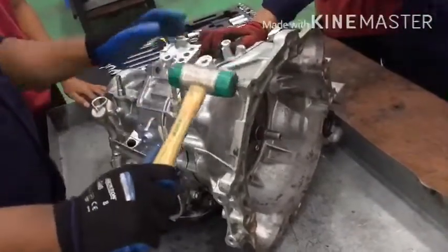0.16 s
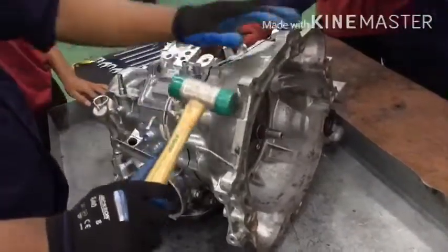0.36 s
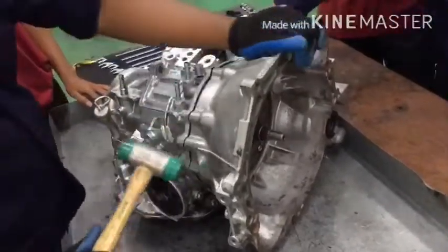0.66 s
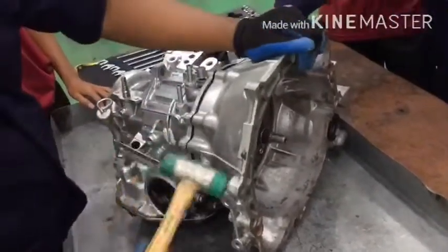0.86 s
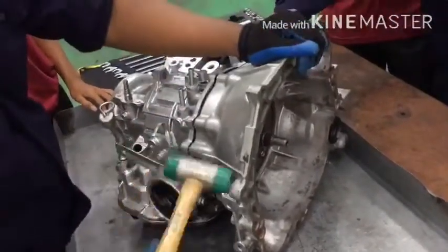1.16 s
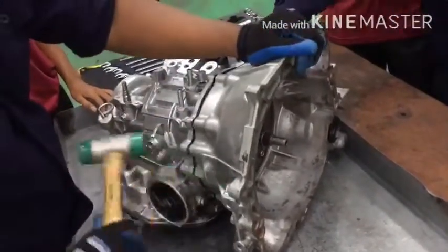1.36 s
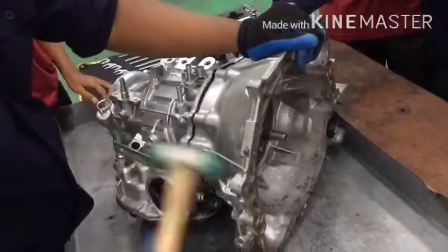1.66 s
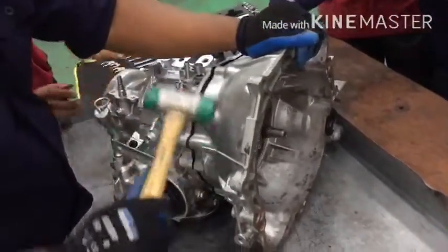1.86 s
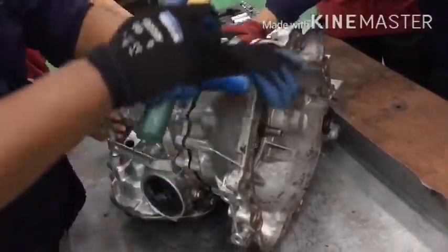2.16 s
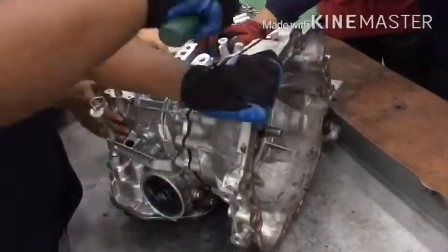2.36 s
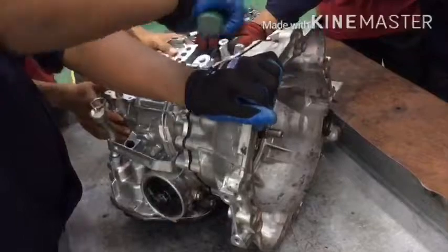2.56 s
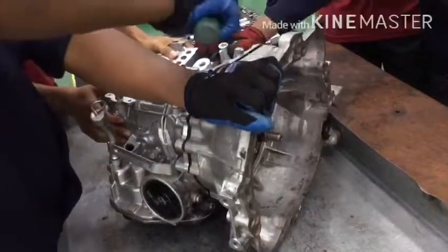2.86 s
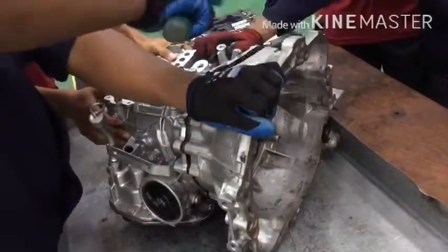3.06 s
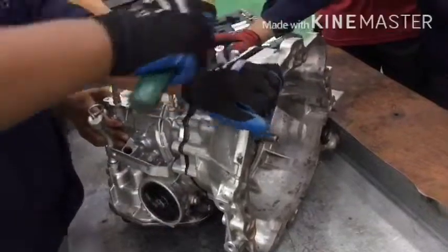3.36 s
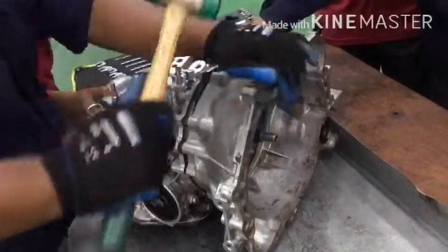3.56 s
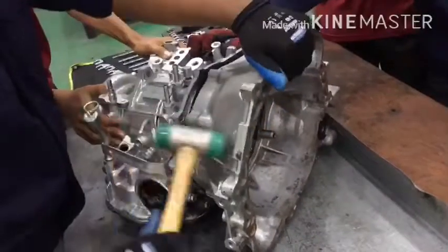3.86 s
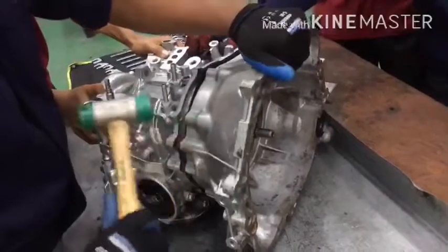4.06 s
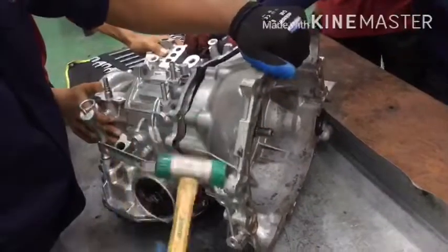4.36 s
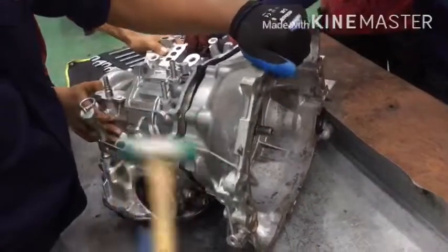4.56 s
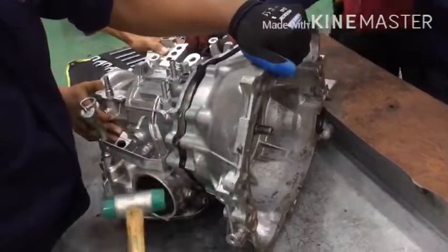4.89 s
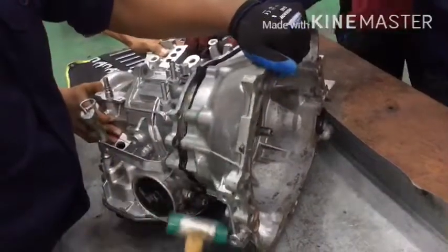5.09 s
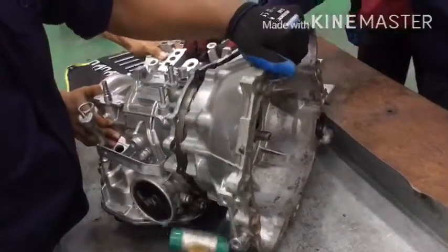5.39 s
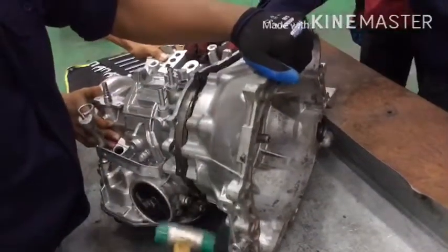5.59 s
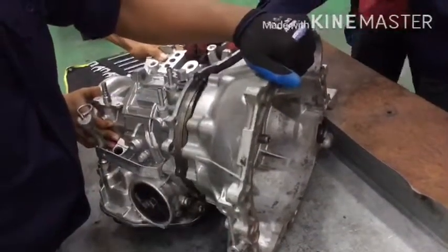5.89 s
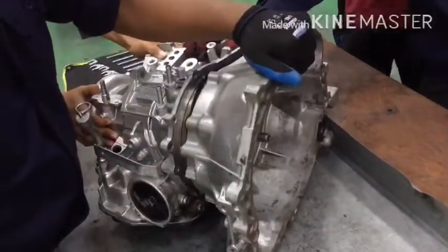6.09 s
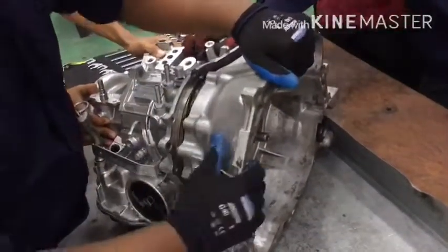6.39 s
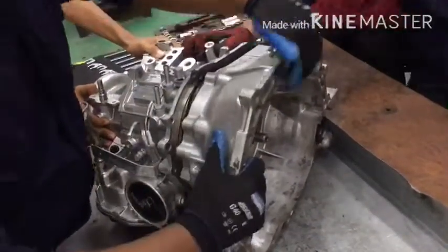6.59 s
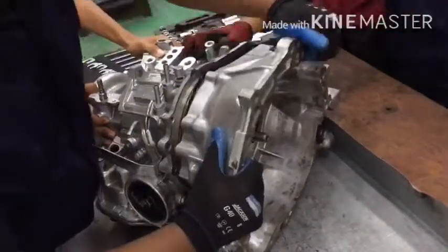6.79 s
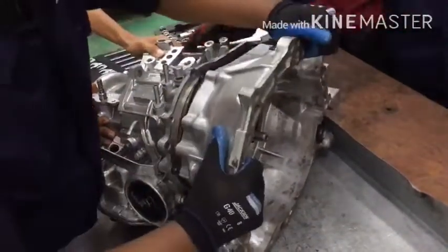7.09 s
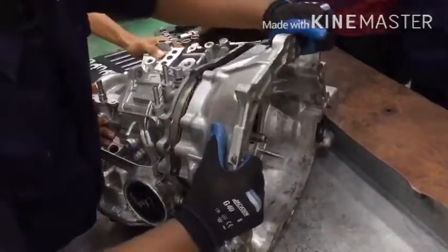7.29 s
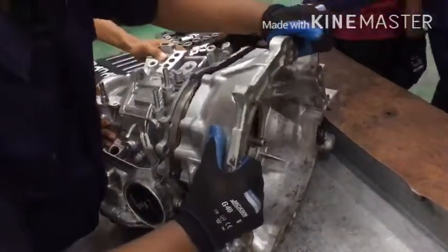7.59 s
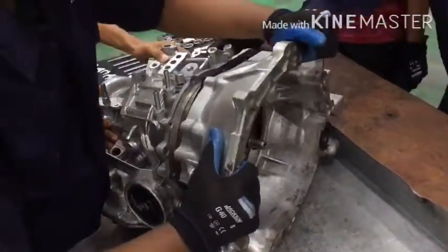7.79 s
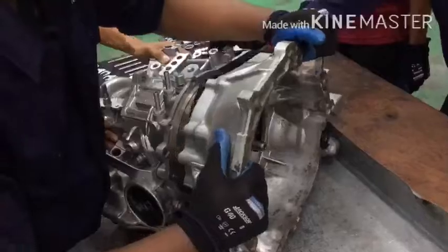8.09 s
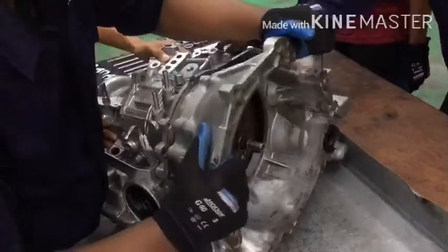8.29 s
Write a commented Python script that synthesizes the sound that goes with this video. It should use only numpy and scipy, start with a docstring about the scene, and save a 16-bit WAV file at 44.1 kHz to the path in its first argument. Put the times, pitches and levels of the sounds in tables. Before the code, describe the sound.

A close microphone in a reverberant workshop picks up irregular low air buffeting, with abrupt puffs, over a soft steady rush. A barely audible tick comes at 0.5 s. Mallet knocks on a cast aluminium housing follow at about 1.0, 1.3, 1.55 and 1.8 s, hollow and clanking with a bench thump, the last heaviest and distorted. A lighter double contact at 2.7 s leads to hard, short blows at 3.0 and 3.3 s. From 4.0 to 4.8 s come duller, lower knocks, some doubled. A strong, brighter ringing blow hits at 5.2 s, another double at 5.5 s. At 6.0 to 6.3 s the loosened half clatters, thinner and brighter. Light scrapes and clinks follow at 6.4, 6.8 and 6.9 s, then thicken from 7.3 s into gritty small rattles, brightest and loudest near 8.35 s, continuing to the end at about 8.4 s.

```python
"""In a workshop, a plastic-faced mallet knocks a cast aluminium gearbox housing on a steel bench until it opens.
Knocks are impact-excited damped modes with noise for dense modes, clashing metal and the bench's thump.
The loosened half clatters, then clinks as it is worked free by hand: grainy scrapes with rim modes.
Moving air, probably from a fan, buffets the close microphone as turbulent noise over a steady rush.
Filtered noise gives the room's reflections; the hardest blows overload the microphone."""
import sys
import numpy as np
from scipy import signal
from scipy.fft import rfft, irfft
from scipy.io import wavfile
from scipy.ndimage import uniform_filter1d

SR = 44100
rng = np.random.default_rng(int(sys.argv[2]) if len(sys.argv) > 2 else 0)


def dump(signal):
    """Clip the signal to [-1, 1] and save it as 16-bit WAV at the path in sys.argv[1]."""
    limited = np.clip(np.atleast_2d(signal).T, -1, 1)
    pcm = np.round(limited * 32767).astype(np.int16)
    wavfile.write(sys.argv[1], SR, pcm)


N = 372644
TIME = np.arange(N) / SR
RING = np.arange(SR // 2) / SR  # time axis of one contact [s]


def undb(db):
    """Level law: converts decibels to an amplitude gain."""
    return 10 ** (np.asarray(db) / 20)


def unit(x):
    """Normalisation: scales a signal to rms 1."""
    return x / np.sqrt(np.mean(x ** 2))


def fade(t60):
    """Exponential damping: falls 60 dB in t60 seconds, over the time axis of one contact."""
    return np.exp(-np.log(1000) * RING / t60)


def noise(gain, size):
    """Spectral shaping: white noise filtered by gain(Hz) and scaled to rms 1."""
    f = np.maximum(np.fft.rfftfreq(size, 1 / SR), 1)
    spectrum = rfft(rng.standard_normal(size)) * gain(f)
    return unit(irfft(spectrum, size))


def colour(points):
    """Spectral envelope: a gain function through (frequency [Hz], level [dB]) points on a log axis."""
    hz, db = np.transpose(points)
    return lambda f: undb(np.interp(np.log(f), np.log(hz), db))


def ripple(gain, depth_db, spacing_hz):
    """Modal clustering: each contact drives its own clusters, as random peaks and dips in a spectrum."""
    db = depth_db * rng.standard_normal(400)
    return lambda f: gain(f) * undb(np.interp(f / spacing_hz, np.arange(len(db)), db))


def even(x, seconds):
    """Envelope levelling: divides a signal by its moving rms to even out slow swells."""
    return x / np.sqrt(uniform_filter1d(x ** 2, int(seconds * SR)) + 1e-9)


def walk(rate):
    """Random modulation: wanders between random values drawn at a rate in Hz, with spread near 1."""
    k = int(SR / rate)
    steps = np.repeat(rng.standard_normal(N // k + 1), k)
    return unit(uniform_filter1d(steps, k)[:N])


def add(out, s, sound):
    """Superposition: mixes a sound in at time s."""
    i = max(int(s * SR), 0)
    out[i:i + len(sound)] += sound[:N - i]


def damped_modes(hz, t60, detune):
    """Modal vibration: one decaying sine per mode, with random phase and a relative random detuning."""
    tuned = hz * (1 + detune * rng.standard_normal(len(hz)))
    cycles = tuned[:, None] * RING + rng.random((len(hz), 1))
    return np.sin(2 * np.pi * cycles) * fade(t60[:, None])


def air_flow():
    """Turbulent flow: the draught flutters; gusts, and one low shake, add swells and abrupt bursts."""
    # mean air flow over the microphone, before trim: (time [s], rumble level [dB])
    draught = [(0.0, -13), (0.42, -21.5), (0.86, -18.5), (1.52, -24), (1.73, -15), (2.08, -17.5),
               (2.74, -23), (3.34, -17.5), (3.93, -29.5), (4.19, -20.5), (4.37, -28), (4.75, -16.5),
               (5.05, -30), (5.45, -24.5), (5.87, -32), (6.55, -18.5), (6.92, -22.5), (7.09, -16),
               (7.44, -19), (7.65, -34.5), (8.26, -22.5), (8.4, -14)]
    # strongest gusts, and one low shake (at 5.226 s) after the hard blow at 5.18 s; rumble before trim:
    # (start [s], rumble level [dB], length [s], eddy level [dB])
    gusts_and_shake = [(0.057, -10, 0.033, -18.5), (0.171, -15.5, .02, -22.5), (0.634, -12, 0.041, -15),
                       (.763, -19, 0.0074, -15.5), (.885, -14.5, 0.011, -14.5), (1.588, -9, 0.024, -19.5),
                       (1.647, -20, 0.023, -15), (1.682, -23, 0.018, -12.5), (1.76, -15, 0.088, -18.5),
                       (1.956, -14, 0.037, -20), (2.013, -15, 0.029, -11.5), (2.133, -9.5, .022, -14),
                       (2.255, -30, 0.0092, -12.5), (2.282, -13.5, 0.018, -14.5), (2.383, -17, 0.014, -30),
                       (2.629, -17, 0.023, -16), (2.682, -16, 0.075, -20), (3.259, -19.5, 0.01, -22.5),
                       (3.358, -16, 0.011, -14), (3.401, -15, 0.04, -19), (4.205, -16, 0.027, -24),
                       (4.347, -17, .02, -27), (4.574, -15, 0.013, -17.5), (4.61, -29, 0.0062, -12.5),
                       (4.798, -15.5, 0.05, -23), (4.917, -9, 0.024, -13.5), (5.071, -18.5, 0.025, -22),
                       (5.226, -17, 0.032, -21.5), (5.28, -13, .048, -14), (5.598, -14, 0.023, -27),
                       (5.694, -18.5, 0.027, -27.5), (6.151, -8, 0.025, -13.5), (6.438, -15, 0.073, -20.5),
                       (6.515, -11, 0.044, -10.5), (6.58, -25, 0.014, -16.5), (6.721, -12, 0.037, -19),
                       (6.932, -15, 0.023, -19), (6.992, -15.5, .03, -24.5), (7.048, -16, 0.063, -20),
                       (7.182, -10.5, 0.016, -33), (7.488, -12.5, 0.057, -18), (7.84, -13.5, 0.043, -30),
                       (8.336, -17, 0.11, -25)]
    draught_trim_db, swell_trim_db = -1, 1
    flutter_hz, flutter_db = 14, 2  # random puffs: rate and spread
    draught_eddy_db = -18  # eddies of the mean flow, relative to its rumble
    attack_s, release_s = 0.003, 0.0092  # time constants of the bursts
    swell_s, swell_share = 0.011, 0.44  # Gaussian half width: a minimum plus a share of the length

    mean_db = np.interp(TIME, *np.transpose(draught)) + draught_trim_db
    flow = undb(mean_db + flutter_db * walk(flutter_hz))
    force = flow * undb(draught_eddy_db)
    for s, db, length, eddy_db in gusts_and_shake:
        near = abs(TIME - s) < 0.25
        since = TIME[near] - s
        swell = np.exp(-0.5 * ((since - length / 2) / (swell_s + swell_share * length)) ** 2)
        # bursts set in abruptly, hold for the given length and die away
        onset, ending = np.minimum(since, 0) / attack_s, np.maximum(since - length, 0) / release_s
        burst = np.exp(onset - ending)
        flow[near] = np.hypot(flow[near], undb(db + swell_trim_db) * swell)
        force[near] = np.hypot(force[near], undb(eddy_db) * burst)
    return flow, force


def wind_rumble(flow):
    """Flow-induced pressure: low noise follows the flow, and stronger flow lifts its upper part more."""
    # spectrum of the rumble: (frequency [Hz], level per Hz [dB])
    rumble_spectrum = [(20, -40), (33, -11), (58, 2.5), (85, -1), (125, -2), (180, -9), (260, -18),
                       (400, -26.5), (800, -38.5), (2000, -85)]
    split_hz = 130
    rise, even_db = 0.35, -16  # the upper part gains extra dB per dB of flow relative to this level
    pressure = even(noise(colour(rumble_spectrum), N), 0.0666)
    deep = signal.sosfiltfilt(signal.butter(2, split_hz, fs=SR, output="sos"), pressure)
    upper = pressure - deep
    return flow * (deep + upper * (flow / undb(even_db)) ** rise)


def wind_eddies(force):
    """Turbulent cascade: half-octave noise bands reach higher in pitch as the eddies strengthen."""
    burst_hz, burst_db = 130.3, 2.5  # short random bursts: rate and spread before levelling
    corner_hz, corner_at_db, top_hz = 560, -15.0, 1100  # treble corner at this force, and its ceiling
    force = force * even(undb(burst_db * walk(burst_hz)), 0.032)
    corner = np.minimum(corner_hz * (force / undb(corner_at_db)) ** 0.78, top_hz)
    eddies, power = 0, 0
    for hz in 220 * np.sqrt(2) ** np.arange(9):
        edges = [hz / 2 ** 0.25, hz * 2 ** 0.25]
        band_filter = signal.butter(2, edges, "band", fs=SR, output="sos")
        band = signal.sosfilt(band_filter, rng.standard_normal(N))
        weight = (hz / 220) ** -0.25 / np.sqrt(1 + (hz / corner) ** (2 * 2.84))
        eddies = eddies + weight * unit(band)
        power = power + weight ** 2
    # constant power leaves the level to the force alone
    return force * even(eddies / np.sqrt(power), 0.033)


def wind():
    """Microphone turbulence: one flow drives the low rumble and faster eddies, a blow's low shake included."""
    flow, force = air_flow()
    return wind_rumble(flow) + wind_eddies(force)


def workshop():
    """Incoherent summation: fans and far machines blend into a soft, slightly wavering rush."""
    # spectrum of the rush: (frequency [Hz], level per Hz [dB])
    shop_spectrum = [(200, 8), (580, 3.5), (900, 3.5), (1400, 1), (2300, -4), (4000, -9), (5000, -13),
                     (6200, -12.5), (7500, -19), (9500, -21), (11000, -23.5), (15500, -28.5)]
    level_db = -38.5
    waver = undb(0.6 * walk(5))
    return noise(colour(shop_spectrum), N) * undb(level_db) * waver


def clink(db, t60, bright_hz, scrape_s):
    """Frictional excitation: metal slips on metal in a grainy scrape, and the rim rings in damped modes."""
    # resonances of the rim and dowels: (frequency [Hz], relative level [dB], decay t60 [s])
    rim_modes = [(1340, 0, 0.27), (1920, -6.5, 0.18), (2016, -7, 0.24), (2260, -5, 0.25), (3170, -21, .06),
                 (3570, 2, 0.1), (3800, -3, 0.14), (4040, -6, 0.084), (4530, -19.5, .05), (5400, -4, 0.097),
                 (6870, -22, .04), (8000, -16, .04), (9200, 4, 0.047), (9600, -1, .03), (11500, -7, .03)]
    ring_db, tick_db = -5, -1  # relative to the clink's level
    hz, mode_db, mode_t60 = np.transpose(rim_modes)
    reach = lambda f: 1 / np.sqrt((1 + (f / bright_hz) ** 3.0) * (1 + (1100 / f) ** 4))

    share = undb(mode_db + 2 * rng.standard_normal(len(hz))) * reach(hz)
    share *= np.sqrt(2 / np.sum(share ** 2))
    rings = share @ damped_modes(hz, mode_t60, 0.008)

    # the sound grows while the faces slip; the scrape dies once they stop
    growth = np.minimum(RING / scrape_s, 1) ** 0.4
    contact = np.minimum(fade(t60) * undb(60 * scrape_s / t60), 1)
    grain = undb(1.6 * walk(294)[:len(RING)])
    tick = noise(ripple(reach, depth_db=5, spacing_hz=198.2), len(RING)) * contact * grain
    return undb(db) * growth * (undb(ring_db) * rings + undb(tick_db) * tick)


def casting(db, reach, t60, spot_hz, spot_db):
    """Modal superposition: the struck casting rings in distinct modes and a dense noise-like remainder."""
    # modes of the housing: (frequency [Hz], relative level [dB], t60 before the blow's extra damping [s])
    housing_modes = [(367, 4.5, 0.3), (600.5, 7.5, 0.073), (777, 5.5, 0.035), (874, 0, 0.16),
                     (946.5, 3, 0.22), (1027.4, -3, 0.88), (1102, -6, 0.52), (1171, 2.5, 0.11),
                     (1227, -0.5, 0.13), (1397, 0.5, 0.25), (1476, -4, 0.42), (1770, -49, 0.083),
                     (1730, -21, 0.44), (1885, -5.5, 0.12), (2265, -14, 0.87), (2800, -7, 0.24),
                     (2923, -4, 0.21), (2765, -14, 0.29), (3150, -10, .28), (3680, -20, .22),
                     (3800, -10, 0.16), (4470, -22, .25), (5630, -12, 0.27), (6000, -8, 0.33)]
    modes_db, dense_db = -4, -5  # relative to the blow's level
    punch, jolt_s = 0.51, 0.027
    hz, mode_db, mode_t60 = np.transpose(housing_modes)
    # hands and the changing fit of the joint detune every mode a little; the blow's t60 adds damping
    rings = damped_modes(hz, mode_t60, 0.004) * fade(2 * t60)
    share = undb(mode_db + 2 * rng.standard_normal(len(hz))) * reach(hz)
    share *= undb(db + modes_db) * np.sqrt(2 / np.sum(share ** 2))
    # the struck spot favours one mode
    share[np.argmin(abs(np.log(hz / spot_hz)))] = undb(spot_db)
    # gears, ribs and bench add modes too dense to tell apart
    crowd = even(noise(ripple(reach, depth_db=1.5, spacing_hz=124.6), len(RING)), 0.0027)
    dense = undb(db + dense_db) * crowd * fade(t60)
    # the casting jolts on the bench: louder for a moment, then settling
    jolt = 1 + punch * np.exp(-(RING / jolt_s) ** 4)
    return (share @ rings + dense) * jolt


def metal_clash(clash_db, bright_hz, t60, metal):
    """Broadband impact: metal faces clash in decaying noise, duller for a dull blow, with a random chatter."""
    bite = ripple(lambda f: metal(f) / np.hypot(1, f / (8 * bright_hz)), depth_db=1.5, spacing_hz=166.3)
    chatter = undb(1.2 * walk(163)[:len(RING)])
    decay = fade(0.23 * t60 / 0.14)
    return undb(clash_db) * noise(bite, len(RING)) * decay * chatter


def bench_thump(db, bass_hz):
    """Structure-borne impact: the steel bench takes the blow with a short low thump."""
    thump_db = -12  # relative to the blow, at a bass corner of 400 Hz
    spectrum = colour([(100, -25), (220, 1), (380, -4), (560, -33), (1200, -59)])
    bench = even(noise(spectrum, len(RING)), 0.021)
    return undb(db + thump_db) * 400 / bass_hz * bench * fade(0.19)


def knock(db, bright_hz, bass_hz, t60, spot_hz, spot_db, clash_db):
    """Contact mechanics: the plastic face slaps and pushes for a few ms, exciting casting, faces and bench."""
    reach = lambda f: 1 / np.sqrt((1 + (f / bright_hz) ** 5) * (1 + (bass_hz / f) ** 5))
    metal = colour([(500, 5.5), (1400, 6.5), (2200, -7.0), (3500, 0), (5200, -7.5), (6500, -5.5),
                    (7600, -13.0), (9000, -9.0), (10800, -15.5), (13000, -10.5), (16000, -22.5)])
    slap = undb(-19) * noise(metal, len(RING)) * fade(0.036)
    # a harder contact is both shorter and brighter: 3.9 ms rise at 1600 Hz
    push = 1 - np.exp(-(RING / 0.0039 * bright_hz / 1600) ** 2)
    body = casting(db, reach, t60, spot_hz, spot_db)
    clash = metal_clash(clash_db, bright_hz, t60, metal)
    return slap + push * (body + clash + bench_thump(db, bass_hz))


def room(x):
    """Reverberation: convolves with early echoes off bench, floor and people and a faint, duller hall tail."""
    early_db, early_t60 = -15, 0.19
    hall_db, hall_t60 = -27, 2.3
    early_gain = lambda f: 1 / np.hypot(1, f / 6000) / np.hypot(1, 800 / f)
    early = noise(early_gain, len(RING)) * fade(early_t60) * (RING > 0.025)
    # air takes the treble out of the long tail
    hall_gain = lambda f: 1 / np.hypot(1, (f / 4000) ** 2) / np.hypot(1, 700 / f)
    hall = noise(hall_gain, N) * undb(-60 * TIME / hall_t60) * (TIME > 0.04)
    response = undb(hall_db) * hall / np.linalg.norm(hall)
    add(response, 0, undb(early_db) * early / np.linalg.norm(early))
    return signal.fftconvolve(x, response)[:N]


def scene():
    """Superposition: knocks and close, drier clinks in the room, with moving air and the workshop's rush."""
    # blows on the housing: (time [s], level [dB], brightness corner [Hz], damping t60 [s],
    # favoured mode [Hz], its level [dB], clash of metal [dB])
    blows = [(.962, -3.5, 2170, .15, 595, -3, -13), (1.289, -7, 1940, 0.14, 595, -3, -19),
             (1.556, -3, 2960, 0.12, 944, -10.5, -13), (1.8, 0.5, 1620, 0.066, 595, 3, -7.5),
             (1.827, -14, 2480, 0.047, 1400, -25.5, -13.5), (2.71, -12, 1400, 0.07, 371, -6.5, -21),
             (2.729, -10.5, 4320, 0.053, 4000, -17, -26), (3.016, -2, 1470, 0.088, 1400, -12, -16),
             (3.298, -2, 1400, 0.073, 1484, -15, -13.5), (3.97, -8.5, 1470, 0.13, 371, -5, -16),
             (4.246, -8, 1490, 0.1, 371, -8.5, -18), (4.476, -6, 1460, 0.091, 595, -7, -19.5),
             (4.522, -8, 1540, 0.044, 371, -18, -19), (4.706, -5, 1220, 0.091, 371, -10.5, -14.5),
             (4.756, -9, 1230, 0.057, 371, -17, -20.5), (5.177, -1.5, 3000, 0.18, 944, -3, -10),
             (5.268, -24, 3500, 0.36, 1106, -33, -28.5), (5.46, -9, 1750, 0.25, 371, -13.5, -19.5),
             (5.493, -6.5, 4240, 0.095, 2243, -15, -16), (5.986, -7, 3640, 0.18, 1106, -12.5, -7),
             (6.022, -12, 6140, .19, 3031, -28, -17), (6.187, -12.5, 3520, 0.16, 1030, -14.5, -14),
             (6.209, -17, 3700, 0.067, 1824, -15, -32), (6.25, -18.5, 3640, 0.2, 1818, -20, -40),
             (6.29, -20.5, 2800, .39, 1030, -27, -46), (8.146, -23, 4000, 0.054, 1400, -28, -20)]
    # light metal contacts:
    # (time [s], level [dB], scrape decay t60 [s], brightness corner [Hz], scraping time [s])
    touches = [(0.472, -40.5, 0.095, 14000, .001), (3.447, -36, 0.075, 9000, 0.013),
               (6.382, -23.5, 0.067, 6000, 0.0054), (6.8, -22, 0.17, 5460, 0.0044),
               (6.935, -24, .08, 4200, .007), (7.31, -27.5, 0.12, 6000, 0.0054),
               (7.334, -23.5, 0.043, 7000, 0.0087), (7.486, -36.5, 0.067, 4000, 0.0045),
               (7.528, -30.5, 0.036, 4970, 0.0019), (7.575, -30.5, 0.046, 11900, 0.005),
               (7.66, -33, 0.046, 5960, 0.002), (7.765, -36.5, .04, 12000, 0.0016),
               (7.83, -27.5, 0.081, 4970, 0.0027), (7.859, -27.5, 0.047, 6900, 0.021),
               (7.935, -24.5, .04, 10000, 0.004), (8.001, -25.5, 0.059, 8000, 0.0045),
               (8.127, -27, 0.048, 8000, 0.0031), (8.141, -19, 0.031, 7900, 0.01),
               (8.221, -27, 0.055, 8000, 0.0017), (8.346, -16.5, 0.067, 14000, 0.0056),
               (8.383, -20, 0.074, 4180, 0.0062), (8.411, -28, 0.12, 7000, .006),
               (8.433, -27, .1, 6000, 0.0061)]
    soft_bright_hz, soft_bass_hz = 1540, 378  # treble and bass corners of a soft blow
    bass_rise = 0.71  # octaves that the bass corner climbs per octave of brightness
    joint_opens_s, loose_bass = 5.9, 1.43  # time, and the bass corner's factor from then on
    clink_wet_db = -5

    knocks, clinks = np.zeros((2, N))
    for s, db, bright_hz, *blow in blows:
        # harder contacts carry less bass, and the loosened half sounds thinner than the closed housing
        bass_hz = soft_bass_hz * (bright_hz / soft_bright_hz) ** bass_rise
        if s > joint_opens_s:
            bass_hz *= loose_bass
        add(knocks, s, knock(db, bright_hz, bass_hz, *blow))
    for s, *touch in touches:
        add(clinks, s, clink(*touch))
    reflections = room(knocks + undb(clink_wet_db) * clinks)
    return (wind() + workshop() + clinks + knocks + reflections)[None]


def record(dry):
    """Saturation and band limiting: the loudest peaks are clipped and the top cut at 16 kHz."""
    clipped = dry / (1 + dry ** 16) ** (1 / 16)
    low_pass = signal.ellip(12, 0.1, 80, 16000, fs=SR, output="sos")
    return signal.sosfilt(low_pass, clipped)


dry = scene()
out = record(dry)
dump(out)
```